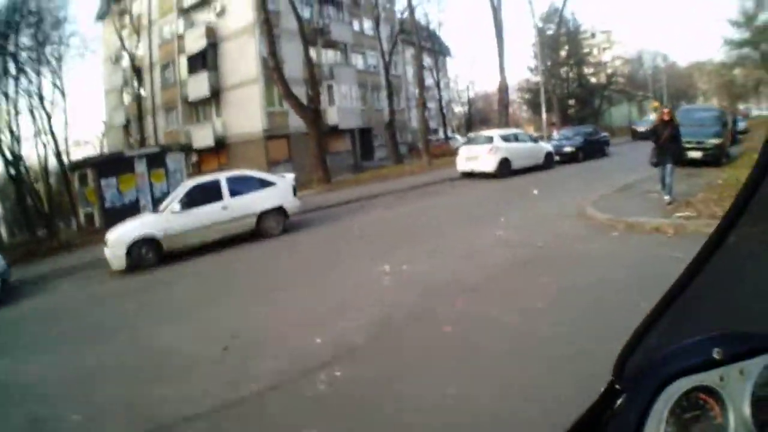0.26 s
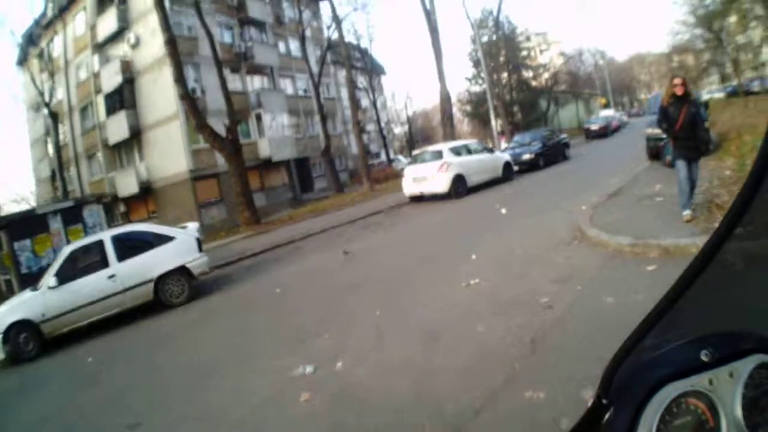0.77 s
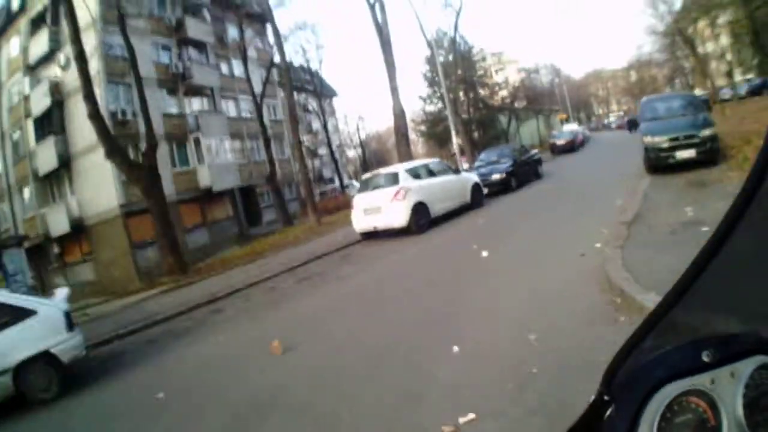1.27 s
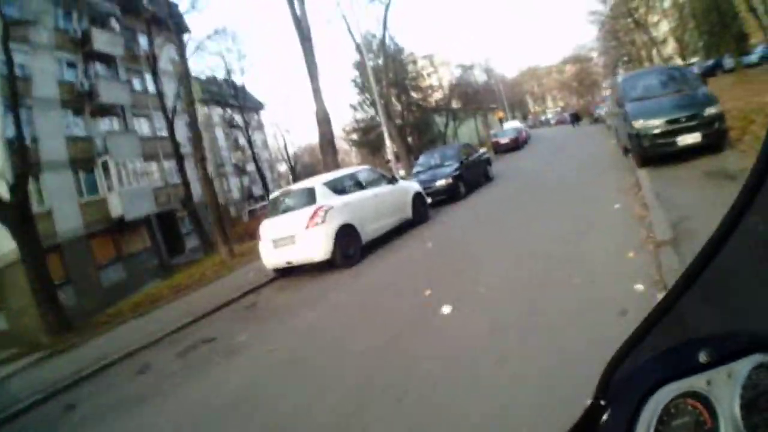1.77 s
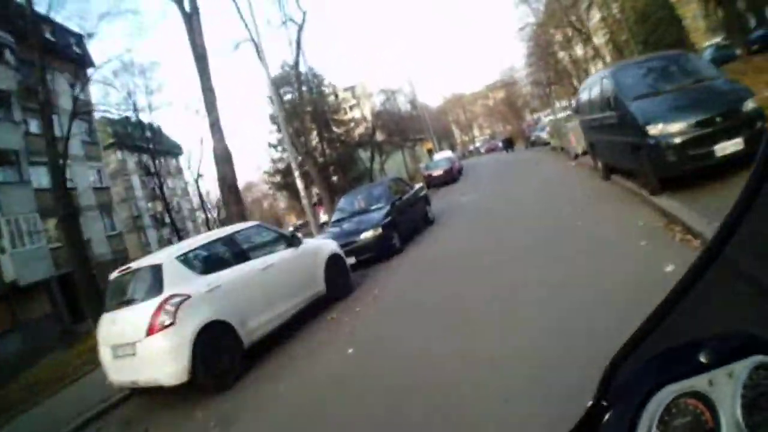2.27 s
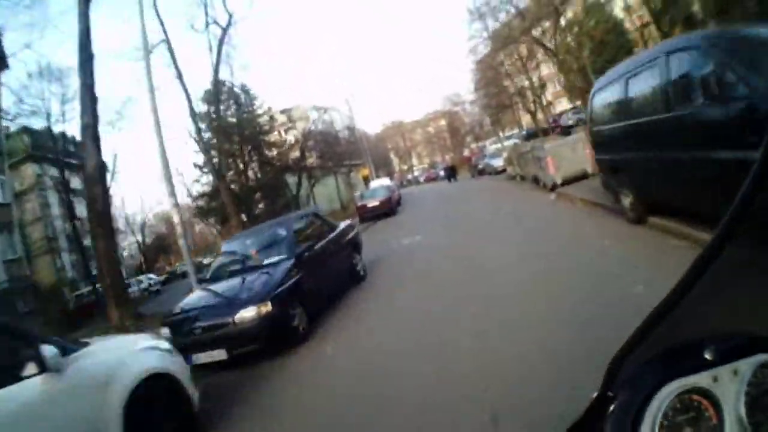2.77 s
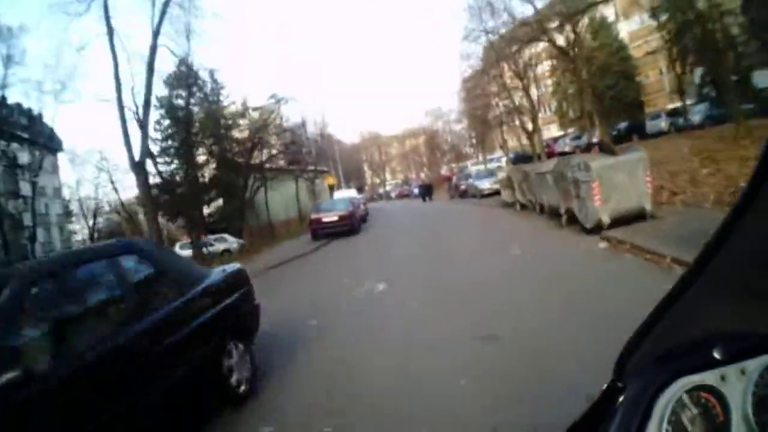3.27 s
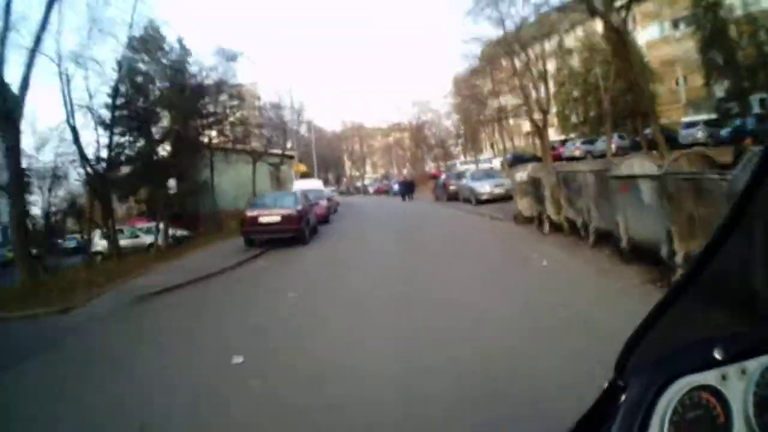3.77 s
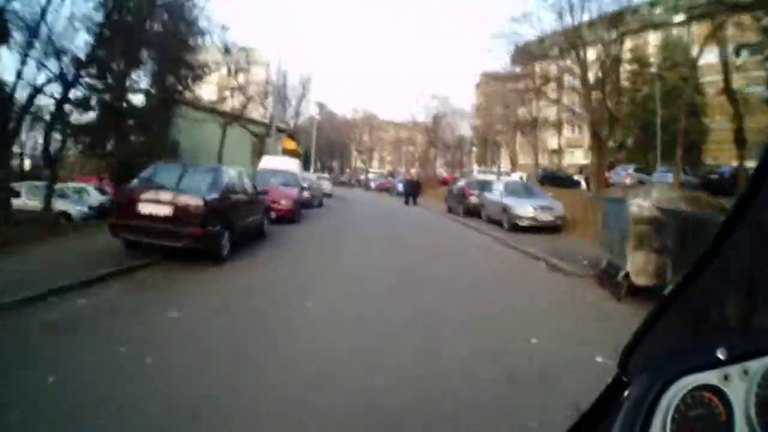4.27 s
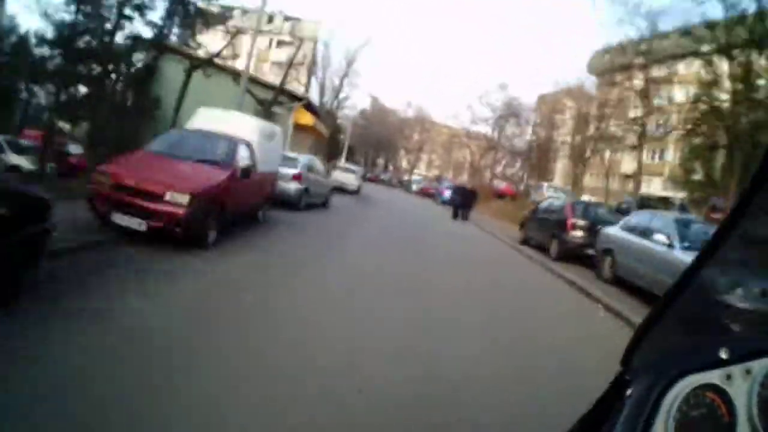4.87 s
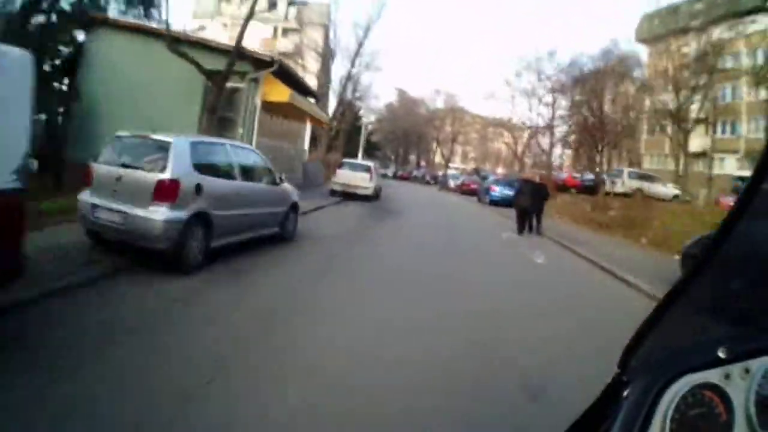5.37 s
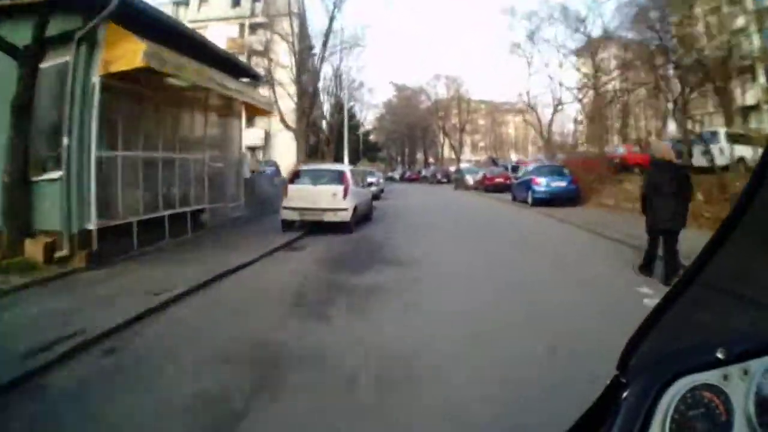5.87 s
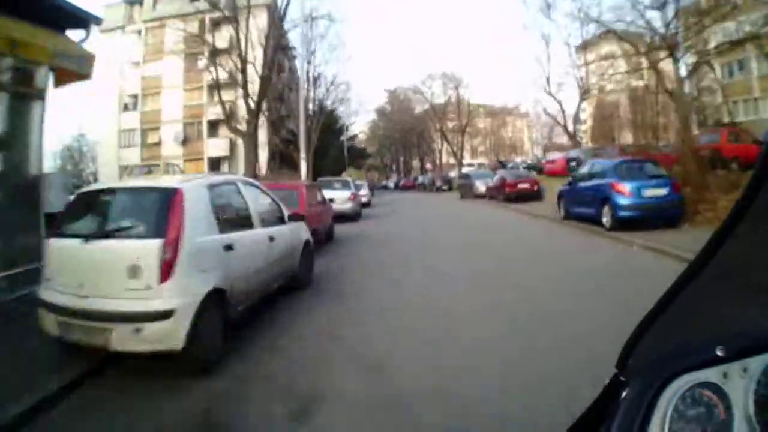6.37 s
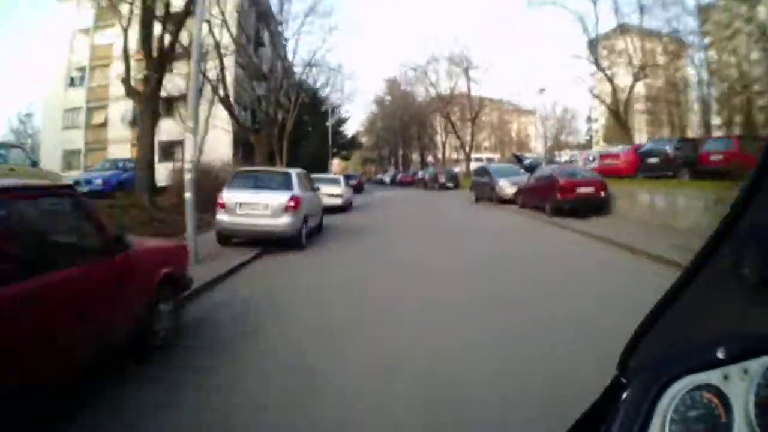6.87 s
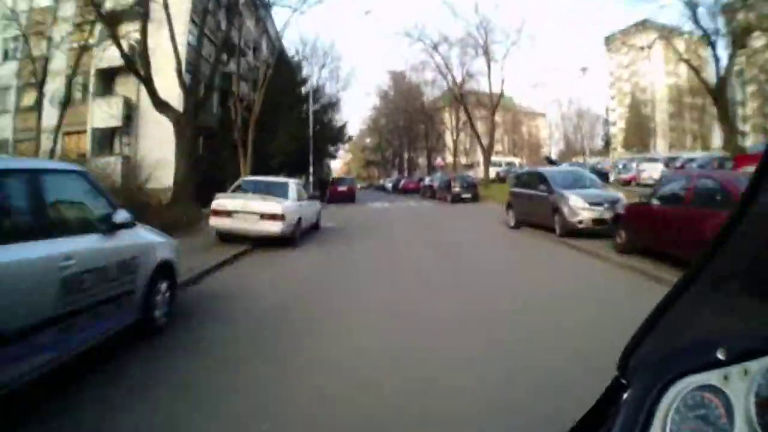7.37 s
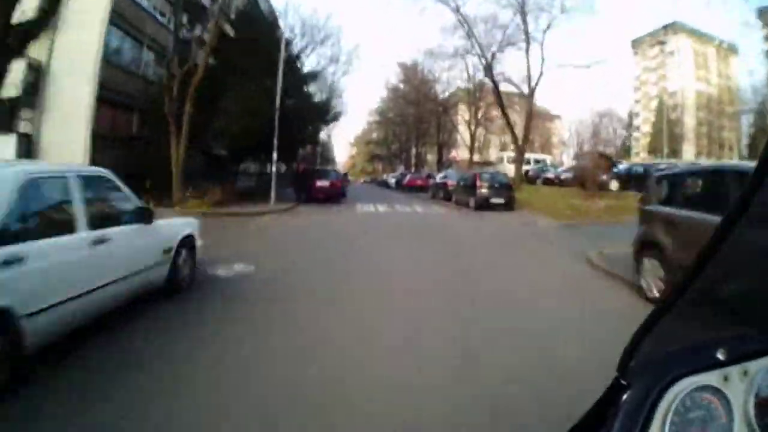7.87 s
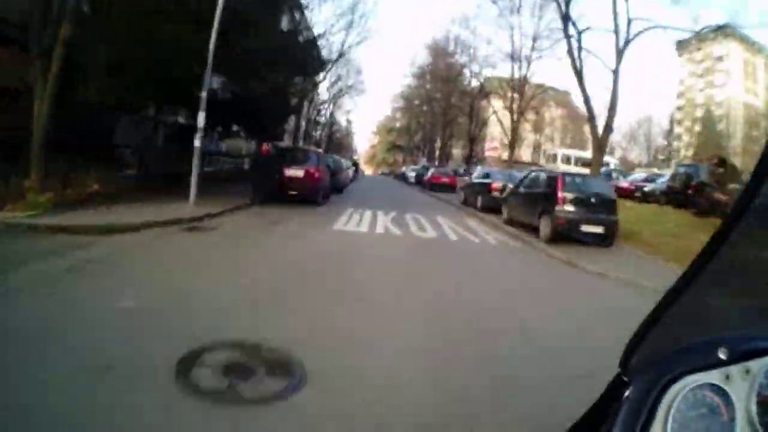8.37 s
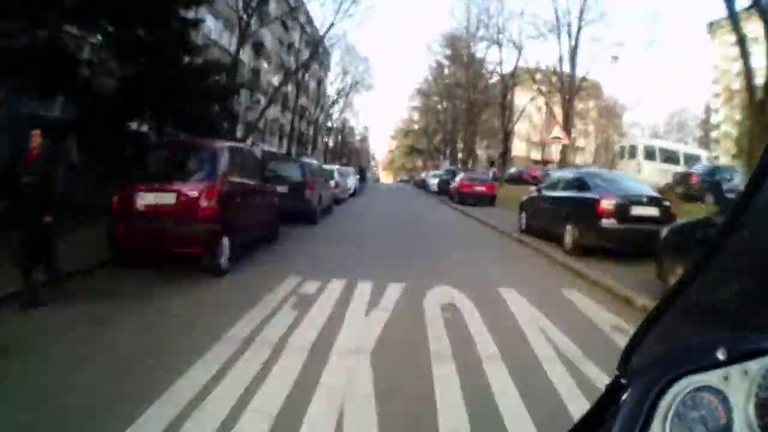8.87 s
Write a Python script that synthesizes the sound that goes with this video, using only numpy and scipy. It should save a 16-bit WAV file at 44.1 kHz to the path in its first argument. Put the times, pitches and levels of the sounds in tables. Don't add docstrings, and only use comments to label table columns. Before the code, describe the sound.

A motorcycle heard from the saddle, close, dry and mono, with dull treble and rough clipping on peaks. From 0 to 1.5 s the single-cylinder engine idles quietly at about 12 to 13 soft thuds a second, with irregular bright loose ticks; a hard casing knock with a low thump lands near 1.57 s. At 1.7 s intake hiss appears and the bike pulls away, the beats quickening, with pulsing gear whine from about 2.5 s. Revs and load climb from 3 to 5.1 s into a loud, booming, raspy roar, nearly tripling idle speed. At 5.2 s it drops sharply for a gear change; whine vanishes, then short rising chirps at 5.7-5.9 s mark the drive returning. A steadier medium drone creeps upward from 6 to 8.15 s over wind and tyre rumble. The throttle shuts, revs sag, a faint chirp sounds at 8.74 s, and the engine pulls again to the end at 9.1 s.

```python
import sys
import numpy as np
from scipy import signal
from scipy.fft import rfft, irfft, next_fast_len
from scipy.io import wavfile
from scipy.ndimage import uniform_filter1d

SR = 44100
rng = np.random.default_rng(int(sys.argv[2]) if len(sys.argv) > 2 else 0)


def volts(x):
    e = np.asarray(x, float) / 20
    return 10 ** e


def wrap_up_sound(samples):
    columns = np.atleast_2d(samples).T
    tamed = np.clip(columns, -1, 1)
    steps = np.round(tamed * 32767).astype(np.int16)
    wavfile.write(sys.argv[1], SR, steps)


N = 401751
t = np.arange(N) / SR
STEP = 32

# time in seconds, throttle opening from 0 to 1.
THROTTLE = [(0, .01), (1.5, 0.02), (1.75, 0.1), (2.1, 0.29), (2.5, 0.29), (2.75, 0.45), (3.5, 0.84),
            (3.75, 0.96), (5.12, 1.0), (5.3, 0.53), (5.72, 0.16), (5.98, 0.55), (8.15, 0.57), (8.4, 0.12),
            (8.72, 0.06), (8.95, 0.39), (9.11, 0.58)]
# start in seconds, end in seconds.
COASTS = [
    (5.22, 5.92),
    (8.17, 8.8),
]


def evened(x):
    return x / np.sqrt(np.mean(x ** 2) + 1e-20)


def column(rows, k):
    rows = np.asarray(rows)
    return np.interp(t, rows[:, 0], rows[:, k])


def read(points, hz):
    f, value = np.transpose(points)
    return np.interp(np.log(hz + 1), np.log(f + 1), value)


def coloured(x, points):
    size = next_fast_len(N)
    gain = volts(read(points, np.fft.rfftfreq(size, 1 / SR)))
    return evened(irfft(rfft(x, size) * gain, size)[:N])


def ring(x, hz, width):
    r = np.exp(-np.pi * width / SR)
    return evened(signal.lfilter([1], [1, -2 * r * np.cos(2 * np.pi * hz / SR), r * r], x))


def wander(hz):
    size = next_fast_len(N // STEP + 2)
    lowpass = 1 + (np.fft.rfftfreq(size, STEP / SR) / hz) ** 2
    slow = irfft(rfft(rng.standard_normal(size)) / lowpass, size)
    return np.interp(np.arange(N) / STEP, np.arange(size), evened(slow))


def beat(cycles, at, width, spread_db):
    shifted = cycles - at + .5
    strength = volts(spread_db * rng.standard_normal(400))[shifted.astype(int) + 1]
    return strength * np.exp(-.5 * ((shifted % 1 - .5) / width) ** 2)


def slack():
    corners = [(start, start + 0.082, end - .06, end) for start, end in COASTS]
    return np.interp(t, np.ravel(corners), np.tile([0, 1, 1, 0], len(COASTS)))


def swells(rows):
    slow = t[::STEP]
    lift_db = sum(db * np.exp(-.5 * ((slow - s) / width) ** 2) for s, width, db in rows)
    return np.interp(t, slow, lift_db)


def level(name, hz):
    # time in seconds, half width in seconds, lift in dB.
    passes = [(2.55, 0.14, 1), (3.299, 0.23, 0), (6.472, 0.035, 3.5), (7.3, 0.3, 0), (7.85, .1, 1)]
    laws = {"clatter": (-27.5, 3.5, 3.5, 0.268, 0.5), "rasp": (-34.5, 5, 9, 0.21, 0.29),
            "whine": (-36.5, 5.5, 4.5, -0.0749, -0.36), "wind": (-31.5, 2.5, -0.6, 0.0321, 0.44)}
    idle_hz, roar_hz = 15.8, 29.2
    idle_db, open_db, full_db, per_db, roar_db = laws[name]
    throttle = column(THROTTLE, 1)
    off_idle = np.clip(throttle / 0.12, 0, 1)
    throttle_db = open_db * off_idle + full_db * throttle
    speed_db = per_db * (hz - idle_hz) + roar_db * np.maximum(hz - roar_hz, 0)
    return idle_db + throttle_db + speed_db + swells(passes)


def piston_shake(hz, cycles):
    # frequency in Hz, level in dB.
    frame_shake = [(50, -31), (60, -21), (68, -25), (80, -41), (96, -31.5), (112, -27.5), (126, -18.5),
                   (142, -19.5)]
    overrun_db, low_db_per_hz = -0.5, 0.15
    falling = np.clip(-np.gradient(hz) * SR, 0, 30)
    braking_db = uniform_filter1d(.14 * falling, size=4000)
    hard = np.clip(braking_db - 3.0, 0, 1) * slack()
    hard_db = hard * (overrun_db + low_db_per_hz * np.maximum(130 - 4 * hz, 0))
    shake_db = read(frame_shake, 4 * hz) + hard_db + braking_db + wander(2.7)
    return volts(shake_db) * np.cos(2 * np.pi * 4 * cycles)


def crank_unbalance(hz, cycles):
    # frequency in Hz, level in dB.
    frame_rock = [(24, -62), (29, -41.5), (34, -29), (46, -38.5), (56, -33.5), (62, -22.5), (70, -19)]
    return volts(read(frame_rock, 2 * hz) - 2 * slack()) * np.cos(2 * np.pi * 2 * cycles + 1.0)


def boom(hz, cycles):
    # frequency in Hz, level in dB.
    pipe = [(25.0, 17), (70.0, -11.7), (105.0, -7.5), (135.0, 5.5), (152.0, 1), (172.0, 4), (205.0, -10.3),
            (240.0, 0), (275.0, -0.7), (297.0, 6), (320.0, 5.5), (360.0, -2.3), (420.0, -12.5), (520.0, 1)]
    # multiple of the firing rate, level in dB.
    orders = [(1, -13.5), (3, 7.5), (5, 4.5), (6, 2.9), (7, 3.5), (8, 0.3), (9, -1.6), (10, 1.1), (11, 0),
              (12, -7), (13, 2.6), (14, -2.5), (15, 0.1), (16, 1.5)]
    # centre in Hz, width in Hz,
    # level in dB at 30 firings a second, dB gained per extra firing.
    fairing = [(560, 40, 1, 1.1), (775, 35, 1, -.1)]
    slow_hz = hz[::STEP]
    load_db = -31 + 20 * np.log10(np.maximum(column(THROTTLE, 1)[::STEP], .003))
    out = piston_shake(hz, cycles) + crank_unbalance(hz, cycles)
    for k, db in orders:
        idle_db = -39 - 3.3 * np.maximum(k * slow_hz - 112, 0) - 7.1 * np.maximum(slow_hz - 15, 0)
        order_db = np.maximum(load_db + db + read(pipe, k * slow_hz), idle_db) + 0.65 * wander(3.3)[::STEP]
        phase = k * (cycles - .7) + rng.random() * 0.52
        out += np.repeat(volts(order_db), STEP)[:N] * np.cos(2 * np.pi * phase)
    for k in range(17, 34):
        lift = 0
        for f, width, db, gain in fairing:
            lift = lift + volts(db + gain * (slow_hz - 30)) / (1 + ((k * slow_hz - f) / width) ** 2)
        phase = k * cycles + rng.random()
        out += np.repeat(volts(load_db) * lift, STEP)[:N] * np.cos(2 * np.pi * phase)
    return volts(4.5) * out


def clatter(hz, cycles, bang):
    # frequency in Hz, level in dB per Hz.
    casing = [(88, -57.5), (150, -17), (270, -5), (379, -8.5), (435, 3), (611, -20.5), (858, -25),
              (941, -16), (1500, -4.5), (2900, -12.5), (4210, -24), (6000, -56.5), (7800, -74),
              (13200, -120)]
    # frequency in Hz, width in Hz, level in dB.
    casing_modes = [(458.4, 30, -7), (935, 35, -4), (1140, 70, 0), (1215, 50, -1), (1390, 40, -9)]
    apart = np.clip(15 / hz, 0, 1) ** 0.48
    valves = beat(cycles, .15, .06, 1.5) + beat(cycles, .9, .05, 1.5)
    blows = 0.8 + apart * (bang + .5 * valves)
    drive = rng.standard_normal(N) * blows * volts(0.98 * wander(170))
    modes = sum(volts(db) * ring(ring(drive, f, 2 * width), f, 2 * width) for f, width, db in casing_modes)
    body = (1.3 - 0.46 * apart) * coloured(drive, casing) + apart * modes
    return volts(level("clatter", hz)) * evened(body)


def rasp(hz, cycles, bang):
    # frequency in Hz, level in dB per Hz.
    intake = [(300, -9.5), (800, 3), (1500, -1.5), (2150, -0.5), (2330, -2), (2500, 2), (2900, -2.5),
              (3500, -15), (4500, -20), (6300, -57)]
    # frequency in Hz, level in dB per Hz.
    throttle_air = [(3000, -21.5), (3600, -4), (4150, 7.5), (4600, 4), (5100, 2.5), (6300, -11)]
    gulp = beat(cycles, 0.0061, 0.14, 4.9)
    flow = 2.2 + 0.42 * bang + 0.42 * gulp
    drive = rng.standard_normal(N) * flow * volts(2.46 * wander(210))
    airbox = volts(-4) * ring(drive, 2365, 70)
    hiss_db = -9.0 - 10 * np.clip((1.715 - t) / .01, 0, 1)
    hiss = volts(hiss_db) * (coloured(drive, throttle_air) + airbox)
    return volts(level("rasp", hz) + 1.0) * (coloured(drive, intake) + hiss)


def whine(hz, fired, bang):
    # time in seconds, share of the mean speed.
    ripple = [(0, .08), (2.5, .08), (2.7, .11), (3.0, .08), (3.5, .065), (3.9, .035), (5.2, .05),
              (5.9, .04), (8.2, .028), (9.11, .045)]
    # multiple of the engine cycle, level in dB.
    tooth_contacts = [(74.5, 0), (67, -9)]
    # centre in Hz, width in Hz, level in dB.
    cover_modes = [(1330, 150, 3), (1760, 60, 3), (1950, 120, -1), (2340, 70, 4), (2750, 130, 7)]
    surge = 1 + column(ripple, 1) * np.cos(2 * np.pi * fired)
    crank = np.cumsum(hz * surge) / SR + .0015 * wander(50)
    tone = sum(volts(db + 2.0 * wander(60)) * np.cos(2 * np.pi * k * crank) for k, db in tooth_contacts)
    backlash = beat(fired, .55, .1, 3.0) * np.clip((hz - 24) / 2, 0, 1)
    mesh_hz = tooth_contacts[0][0] * hz * surge
    cover = 1 + sum(volts(db) / (1 + ((mesh_hz - f) / width) ** 2) for f, width, db in cover_modes)
    next_gear_db = -3 * (t > COASTS[0][0])
    gear_db = level("whine", hz) - 27.5 * slack() + next_gear_db
    out = volts(gear_db) * cover * evened(tone * (.45 + bang + .6 * backlash))
    add_take_up(out)
    return out


def add_take_up(out):
    # start in seconds, length in seconds, first pitch in Hz, last pitch in Hz, level in dB.
    take_up = [
        (5.72, .11, 1450, 2000, -25),
        (5.82, .1, 2000, 2050, -23),
        (5.78, .09, 2350, 2360, -23),
        (8.74, .07, 1200, 1650, -30),
    ]
    for s, length, from_hz, to_hz, db in take_up:
        u = np.arange(0, length, 1 / SR) / length
        at = slice(round(s * SR), round(s * SR) + len(u))
        glide = np.cumsum(from_hz + (to_hz - from_hz) * u + 50 * wander(60)[at]) / SR
        swell = volts(db + 3 + 3.0 * wander(50)[at]) * np.sqrt(np.sin(np.pi * u))
        out[at] += swell * np.cos(2 * np.pi * glide)


def wind(hz):
    # frequency in Hz, level in dB per Hz.
    wind_spectrum = [(10, -4), (22, 1), (60, 3.5), (120, -1.5), (250, -1.5), (450, -7.5), (800, -9.5),
                     (1500, -62.5)]
    # time in seconds, road speed in m/s.
    road = [(0, 2.16), (1.5, 2.4), (2.0, 2.85), (3.5, 2.83), (4.3, 3.7), (5.2, 5.55), (6.1, 4.4), (8.2, 5),
            (9.11, 5.76)]
    # time in seconds, half width in seconds, lift in dB.
    gusts = [(1.85, 0.11, 2.5), (5.55, .12, 1), (6.5, 0.039, 1.5), (7.35, 0.1, 3), (8.219, 0.09, 2),
             (8.7, 0.066, 0)]
    lumps = volts(0.45 * wander(5.4) + 0.78 * wander(43))
    speed_db = 28 * np.log10(np.maximum(column(road, 1), .5) / 2)
    speed_db += swells(gusts)
    return volts(level("wind", hz) + speed_db) * evened(lumps * coloured(rng.standard_normal(N), wind_spectrum))


def knocks():
    # time in seconds, peak in dB, ring in Hz.
    loose_ticks = [(0.2553, -28, 2340), (0.5541, -30, 2060), (0.719, -27, 2860), (0.7706, -34, 2410),
                   (0.844, -32, 2420), (0.9238, -32, 2410), (0.9882, -17, 2660), (1.1334, -16, 2100),
                   (1.2496, -33, 2670), (1.4222, -26, 2120), (1.4915, -29, 2140), (1.562, -23, 2280)]
    # time in seconds, peak in dB, ring in Hz.
    casing_knocks = [
        (1.249, -14, 1090),
        (1.565, -11.5, 1200),
        (1.567, -10.5, 447),
        (1.59, -28, 1150),
    ]
    out, u = np.zeros(N), np.arange(2000) / SR
    for rows, t60, gritty in ((loose_ticks, .008, .6), (casing_knocks, .05, .1)):
        for s, db, f in rows:
            grit = gritty * 2 * uniform_filter1d(rng.standard_normal(len(u)), size=5)
            out[round(s * SR):][:len(u)] += volts(db - 60 * u / t60) * (np.sin(2 * np.pi * f * u) + grit)
    return out


def scene():
    # time in seconds, firings per second.
    engine_speed = [(0.0, 13.43), (0.75, 11.81), (1.52, 12.87), (1.92, 15.47), (2.16, 20.27), (2.42, 19.29),
                    (2.81, 23.46), (3.61, 25.33), (5.1, 35.58), (5.57, 22.88), (5.7, 21.45), (5.99, 25.6),
                    (7.18, 26.93), (7.86, 27.9), (8.17, 28.0), (8.42, 23.2), (8.72, 21.3), (9.11, 21.74)]
    hz = column(engine_speed, 1)
    cycles = np.cumsum(hz) / SR
    fired = cycles + .035 * np.clip(hz - 23, 0, 5) + .3
    bang = beat(fired, 0, 0.09, 1.0)
    engine = boom(hz, cycles) + clatter(hz, cycles, bang) + rasp(hz, cycles, bang) + whine(hz, fired, bang)
    return (engine + knocks() + wind(hz))[None]


def roll_off(x):
    return signal.sosfilt(signal.butter(12, 15800, fs=SR, output="sos"), x)


def record(dry):
    slope_hz, edge_hz, ceiling = 5450, 6250, .72
    overloaded = np.clip(dry, -.7, .7)
    dull = signal.sosfilt(signal.butter(14, slope_hz, fs=SR, output="sos"), overloaded)
    edge = signal.firwin(401, edge_hz, window=("kaiser", 10), fs=SR)
    narrow = signal.oaconvolve(dull, edge[None], "same")
    return roll_off(np.clip(narrow, -ceiling, ceiling))


dry = scene()
out = record(dry)
wrap_up_sound(out)
```